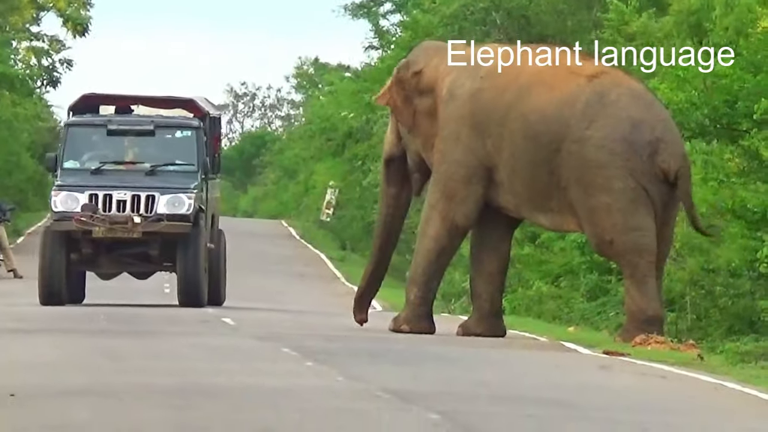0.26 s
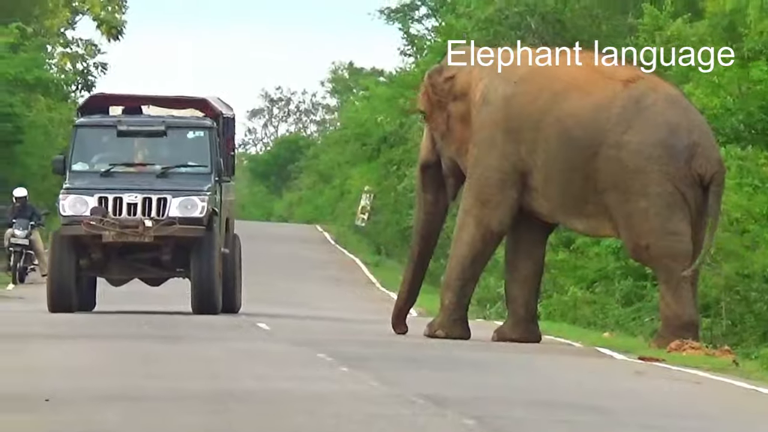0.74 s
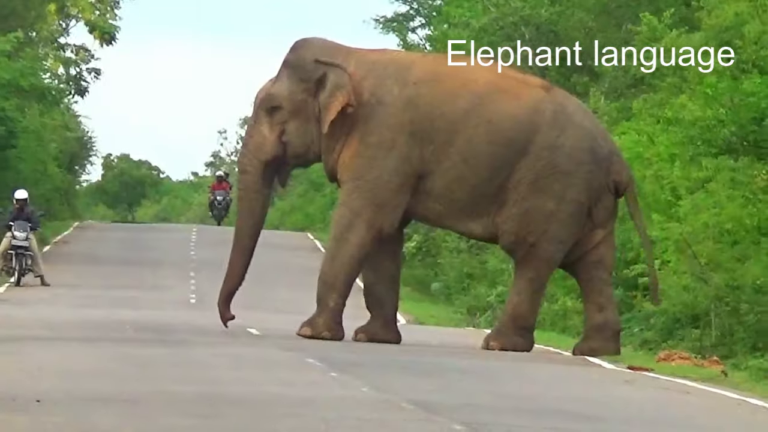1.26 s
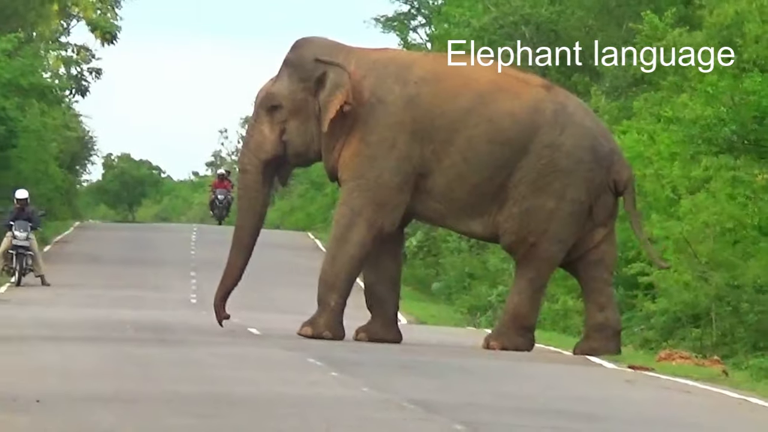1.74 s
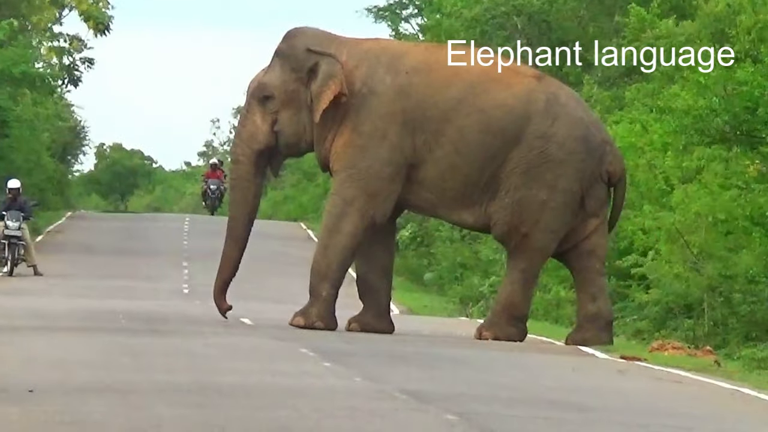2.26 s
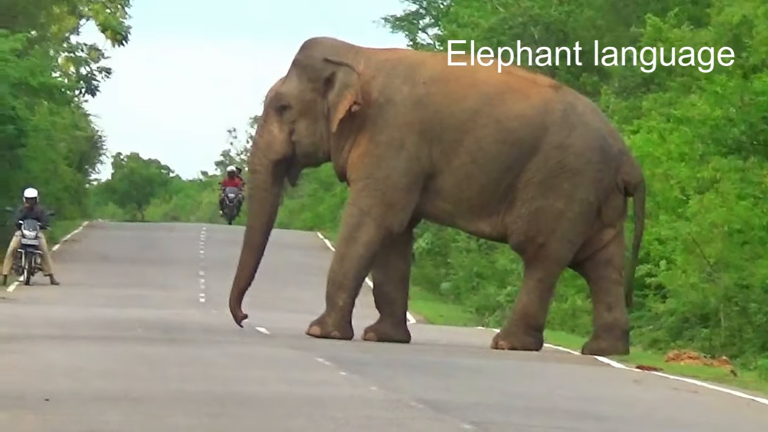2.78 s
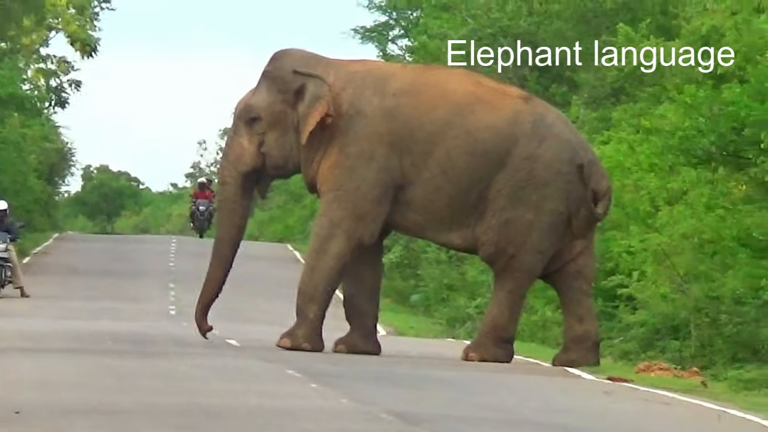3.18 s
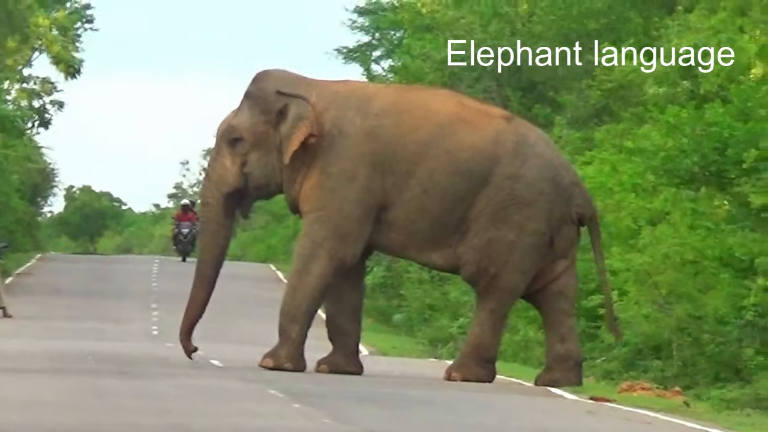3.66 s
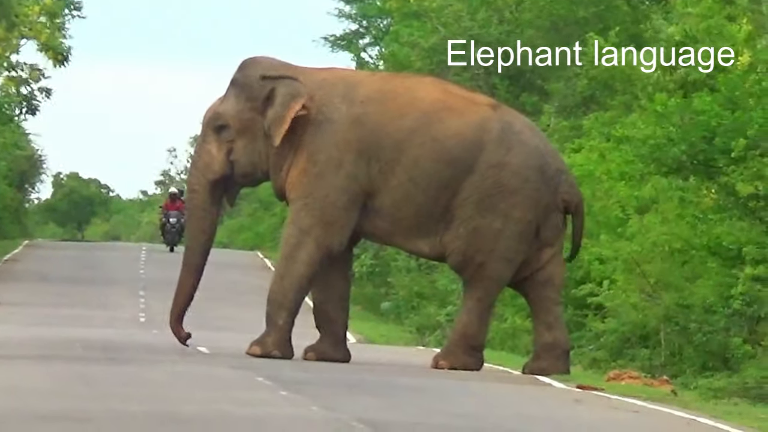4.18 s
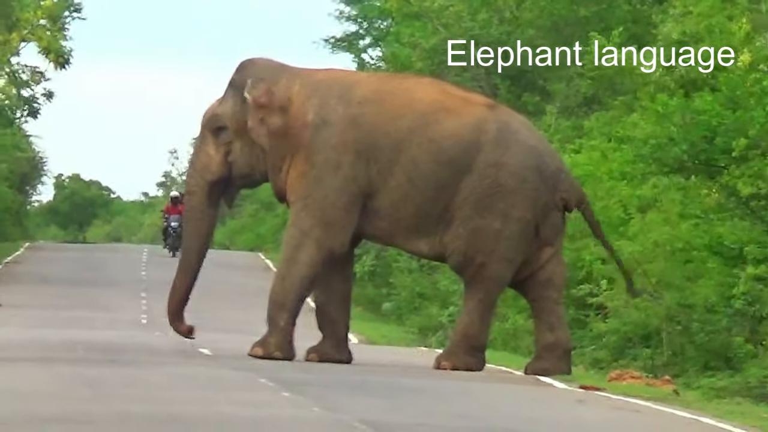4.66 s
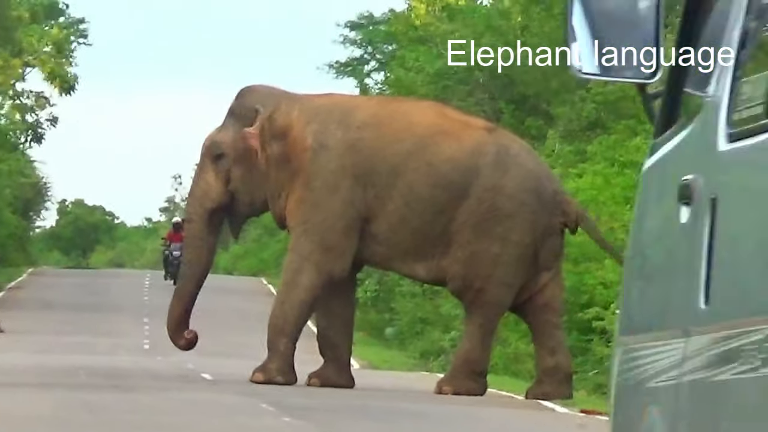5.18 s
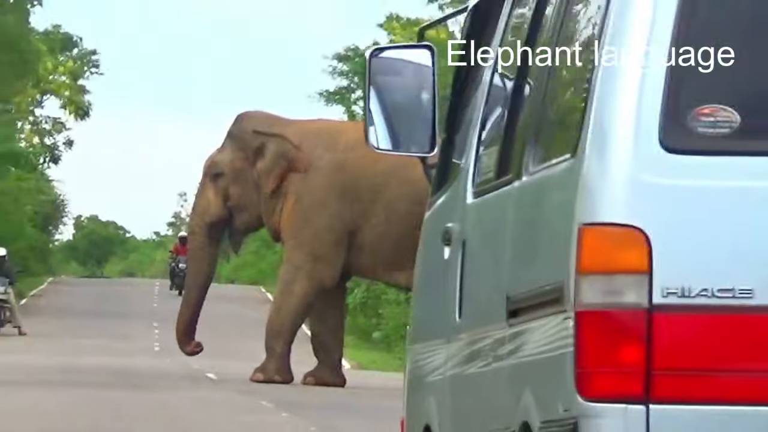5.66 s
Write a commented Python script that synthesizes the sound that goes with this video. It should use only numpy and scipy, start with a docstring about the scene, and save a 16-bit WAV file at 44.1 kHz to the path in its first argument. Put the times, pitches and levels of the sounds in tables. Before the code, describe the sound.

Quiet country road with a distant idling diesel and soft bumps, cut suddenly to a clattering van passing close and receding.

```python
"""A bird whistles over a country road's insects, a distant idling truck and a few soft low bumps.
The sound cuts abruptly to a diesel van that revs up, roars past and draws away, droning and squeaking.
Air, tyres and engine clatter are filtered stereo noise; the drone is a sum of engine orders.
One firing count times the van's chopped roar, ticks, drone and squeak; the bird is gliding sines with echo."""
import sys
import numpy as np
from scipy import signal
from scipy.fft import rfft, irfft
from scipy.io import wavfile
from scipy.ndimage import uniform_filter1d

SR = 44100
rng = np.random.default_rng(int(sys.argv[2]) if len(sys.argv) > 2 else 0)


def dump_mix(stems):
    """Bounce the given channels to the path in sys.argv[1] as a 16-bit WAV at rate SR."""
    frames = np.atleast_2d(stems).T  # one column per channel
    limited = np.clip(frames, -1, 1)  # hard clip at full scale
    pcm = np.round(limited * 32767).astype(np.int16)
    wavfile.write(sys.argv[1], SR, pcm)


N = 261513

T = np.arange(N) / SR
HZ = np.fft.rfftfreq(2048, 1 / SR)
FRAME_S = np.arange(N // 512 + 3) * 512 / SR
EDGE_HZ = 11150  # upper band edge
CUT_S = 1.135  # van heard from here on
ALONGSIDE_S = 3.19  # van beside the microphones

# left-right coherence of a point source [f/Hz, coherence 0-1]
POINT_COHERENCE = [(140, 1), (400, 0.99), (900, 0.87), (2000, 0.87), (4500, 0.92), (10500, 0.81)]
# left-right coherence of sound from all around [f/Hz, coherence 0-1]
AROUND_COHERENCE = [(140, 0.87), (400, 0.65), (800, 0.67), (2000, 0.54), (10500, 0.63)]
# stereo path of rumble, clatter and tyre roar, hiss
# [L-R ahead/dB, L-R behind/dB, added lean/dB, lean centre t/s, lean width/s]
CROSSING = [(0, -0.2, -6, 3.5, 0.66), (-2.5, 1.5, -2.5, 3.03, .42), (-1.9, 0.3, -1.7, 3.81, 0.74)]


def amp(db):
    """Decibels to gain."""
    return 10 ** (np.asarray(db) / 20)


def unit(x):
    """Scales to rms 1."""
    return x / np.sqrt(np.mean(x ** 2) + 1e-20)


def read(points, hz=HZ):
    """Interpolates a spectrum on a log-frequency axis."""
    f, value = np.transpose(points)
    return np.interp(np.log(hz + 1), np.log(f + 1), value)


def bells(modes):
    """Sum of Gaussian resonances and dips over frequency, in dB."""
    return sum(db * np.exp(-2 * ((HZ - hz) / width_hz) ** 2) for hz, width_hz, db in modes)


def colour(x, gain):
    """Zero-phase filter with a gain for each frequency."""
    return irfft(rfft(x) * np.interp(np.fft.rfftfreq(N, 1 / SR), HZ, gain), N)


def wander(rate_hz):
    """Smoothed random drift of rms 1, from knots at ten times the rate."""
    knots_s = np.arange(0, T[-1] + 1, 1 / (10 * rate_hz))
    draws = rng.standard_normal(len(knots_s))
    smooth = signal.fftconvolve(draws, signal.windows.hann(11), "same")
    return unit(np.interp(T, knots_s, smooth))


def place(db):
    """Left and right gains for a level difference."""
    return amp(np.array([db / 2, -db / 2]).reshape(2, -1))


def noise(gain, coherence):
    """Stereo noise of rms 1, shaped by gain and left-right coherence per frame and frequency."""
    a, b, c, d = rng.standard_normal((4, len(FRAME_S), len(HZ)))
    coherence = np.clip(coherence, 0, 1)
    left = a + 1j * b
    right = coherence * left + np.sqrt(1 - coherence ** 2) * (c + 1j * d)
    spectra = np.array([left, right]) * gain
    sound = signal.istft(spectra.transpose(0, 2, 1), nperseg=2048, noverlap=1536)[1]
    return unit(sound[:, :N])


def band(hz, width_hz, coherence):
    """Noise in one resonance, 6 dB down at the edges of its width."""
    return noise(1 / (1 + (2 * (HZ - hz) / width_hz) ** 4), read(coherence))


def strokes(turns, decay, uneven_db):
    """One quick rise and decay per turn, of random strength; decay is a share of a turn."""
    strength = amp(uneven_db * rng.standard_normal(1000))[turns.astype(int) % 1000]
    age = turns % 1 / decay
    return unit(strength * age * np.exp(-age))


def firing_rate():
    """Firings per second: idle, one smooth rise, then a slow creep in gear."""
    idle_hz, rev_hz, creep_hz_per_s = 30.19, 26.8, 1.364
    start_s, length_s = 1.581, 2.13
    revved = np.sin(np.pi / 2 * np.clip((T - start_s) / length_s, 0, 1)) ** 2
    return idle_hz + rev_hz * revved + creep_hz_per_s * np.maximum(T - start_s - length_s, 0)


def passing(closest_s, top_db, reach_s, ahead_db, behind_db):
    """Level in dB of a straight drive-by: a fixed drop per doubling of distance on each side."""
    doublings = np.log2(np.hypot(1, (T - closest_s) / reach_s))
    return top_db - np.where(T < closest_s, ahead_db, behind_db) * doublings


def crossing(ahead_db, behind_db, lean_db, lean_s, width_s, swing_s=.6):
    """Left and right gains that swing as the van goes by, with a temporary lean."""
    passed = (1 + np.tanh((T - ALONGSIDE_S) / swing_s)) / 2
    lean = lean_db * np.exp(-((T - lean_s) / width_s) ** 2)
    return place(ahead_db + (behind_db - ahead_db) * passed + lean)


def blend(times_s):
    """Shares of several states per frame, each state whole at its own time."""
    return np.transpose([np.interp(FRAME_S, times_s, row) for row in np.eye(len(times_s))])


def ports(turn_s=.3):
    """Microphone gains, left and right, by frame and frequency as the source goes from ahead to behind."""
    # microphone colour, source ahead and behind [f/Hz, L-R/dB]
    ports_ahead = [(200, -0.5), (450, -2), (850, .4), (1800, 1.3), (2700, -1.2), (4000, -1.5), (8000, 3.5),
                   (10000, 3.5)]
    ports_behind = [(400, -0.5), (850, 2.2), (1250, 0.7), (1800, -1.3), (2700, -1), (4000, .5), (6000, 0.5),
                    (10000, -0.8)]
    passed = (1 + np.tanh((FRAME_S[:, None] - ALONGSIDE_S) / turn_s)) / 2
    db = (1 - passed) * read(ports_ahead) + passed * read(ports_behind)
    return amp(np.array([db / 2, -db / 2]))


def air():
    """Distant traffic and insects: steady diffuse noise with a fixed spectrum."""
    # relative spectral density [f/Hz, level/dB per Hz]
    air_spectrum = [(25, -32), (70, -12.5), (170, 0.5), (330, -4), (450, -8.5), (650, -2), (900, -14),
                    (2800, -17.5), (4000, -24), (6000, -25), (7500, -11), (8800, -25), (9600, -24),
                    (11000, -35)]
    gain = amp(read(air_spectrum)) * (HZ < EDGE_HZ)
    return amp(-52.64) * noise(gain, read(AROUND_COHERENCE))


def truck():
    """Far diesel idle at about 25 firings/s: each firing gives a tick and a dull, uneven knock."""
    turns = np.cumsum(25 + .15 * wander(3.7)) / SR
    ticks = strokes(turns, decay=.07, uneven_db=1.2) * band(2600, 1600, AROUND_COHERENCE)
    knocks = strokes(turns, decay=0.29, uneven_db=2) * band(350, 530, AROUND_COHERENCE)
    return amp(-68.5) * ticks + amp(-62.0) * knocks


def bumps(rise_s=0.0065):
    """Soft bumps: low noise under short rise-and-decay envelopes."""
    # [t/s, relative peak/dB]
    bump_times = [(0.196, -47), (0.259, -37), (0.289, -37), (0.314, -43), (0.398, -38), (0.621, -42),
                  (0.675, -37), (0.735, -37), (0.774, -37), (0.829, -34.5)]
    envelope = 0
    for start_s, db in bump_times:
        age = np.maximum(T - start_s, 0) / rise_s
        envelope = envelope + amp(db) * age * np.exp(1 - age)
    return amp(-9.5) * envelope * band(240, 240, AROUND_COHERENCE)


def bird(late=1.45):
    """Nearly pure notes swell and slide onto and off a held pitch, with a decaying echo from the trees."""
    # notes [start t/s, length/s, held f/Hz, start offset/Hz, end offset/Hz, level/dB]
    whistle = [(-.035, 0.15, 2940, -300, 0, -58), (.13, .085, 2945, 0, 0, -67),
               (0.187, .285, 2425, 320, -400, -53.5)]
    slide_in, slide_out = 0.5, .28  # shares of a note
    call = 0
    for start_s, length_s, held_hz, in_hz, out_hz, db in whistle:
        u = np.clip((T - start_s) / length_s, 0, 1)
        onto_hz = in_hz * np.maximum(1 - u / slide_in, 0) ** 2
        off_hz = out_hz * np.maximum(1 - (1 - u) / slide_out, 0) ** 1.4
        hz = (held_hz + onto_hz + off_hz) * (1 + 0.0052 * wander(115))
        tone = np.sqrt(2) * np.sin(2 * np.pi * np.cumsum(hz) / SR)
        swell = np.sin(np.pi * u ** late)  # late > 1 delays the peak
        call = call + amp(db) * swell * tone
    trees = rng.standard_normal((2, SR // 2)) * amp(-60 * T[:SR // 2] / .5)  # 60 dB decay in 0.5 s
    echo = signal.fftconvolve(call[None], trees / np.linalg.norm(trees[0]), axes=1)[:, :N]
    return call * place(.6) + amp(-10) * echo


def squeak(turns):
    """Narrow-band ring, rubbed once per engine cycle of four firings, in bouts."""
    # bouts [start t/s, length/s, level/dB]
    bout_times = [(2.8, 0.39, -46), (3.098, .45, -39.5), (3.82, 0.17, -37), (4.05, 0.48, -46.5),
                  (4.516, 0.55, -40), (5.047, 0.51, -55), (5.456, 0.27, -45), (5.7, .25, -53)]
    ring_hz, width_hz, fade_s = 4717, 220, 0.043
    rub = unit(.4 + strokes(turns / 4 + .64, decay=.18, uneven_db=.5))
    ring = band(ring_hz, width_hz, POINT_COHERENCE)
    # friction holds the ring's strength fairly even
    steady = unit(ring / np.sqrt(abs(signal.hilbert(ring)) + 0.43))
    bouts = 0
    for start_s, length_s, db in bout_times:
        edge_s = np.minimum(T - start_s, start_s + length_s - T)
        bouts = bouts + amp(db) * np.clip(edge_s / fade_s, 0, 1)
    return bouts * rub * steady


def tick(turns):
    """Each injection rings two engine modes; the higher one grows as the van nears."""
    peak_s, peak_db, rise_db_per_s, fall_db_per_s = 1.6, -43.5, 16, 20
    blows = strokes(turns + .3, decay=.12, uneven_db=1.5)
    bright_db = np.interp(T, [1.2, 2.4], [-23, -2])
    low_mode = band(2524, 237, POINT_COHERENCE)
    high_mode = band(5430, 300, POINT_COHERENCE)
    ring = low_mode + amp(bright_db) * high_mode
    # falls as the van's front turns away
    level_db = peak_db - np.where(T < peak_s, rise_db_per_s, fall_db_per_s) * abs(T - peak_s)
    return amp(level_db) * blows * ring * crossing(*CROSSING[1])


def drone(turns, rough=0.19, radiate_hz=65):
    """Fluttering engine orders of exhaust, pipe, fan and intake; the deepest radiate poorly."""
    # pass-by of exhaust, pipe boom, fan, intake
    # [closest t/s, reference level/dB, time to drive closest distance/s, ahead and behind loss/dB per doubling]
    tone_paths = [(3.72, -39, 0.37, 13.3, 4.84), (3.62, -35, 0.61, 19, 23), (3.17, -30.5, 0.26, 13.5, 6.2),
                  (3.02, -44.5, .3, 17, 26)]
    # orders [multiple of firing rate, level re path/dB]
    exhaust = [(1, -8), (2, -0.5), (3, -8), (4, 0.5), (6, -5.5), (9, -6), (12, -5), (13, -7.5)]
    boom = [(5, 5.5), (10.2, -7), (10.95, 5), (17, -34.5)]
    fan = [(3.77, 0.5), (7.54, -22), (11.31, -8)]
    intake = [(2, -1)]
    firing_hz, out = firing_rate(), 0
    for orders, path in zip((exhaust, boom, fan, intake), tone_paths):
        level_db = passing(*path)
        for order, db in orders:
            flutter = 1 + rough * np.sqrt(order / 4) * (wander(5) + 1j * wander(17))
            radiated = 1 / np.sqrt(1 + (radiate_hz / (order * firing_hz)) ** 8)
            tone = (flutter * np.exp(2j * np.pi * (order * turns + rng.random()))).real
            out = out + amp(level_db + db) * radiated * tone
    return np.sqrt(2) * out * crossing(*CROSSING[0])


def roar(turns):
    """Engine and tyre noise: colour turns with the van, and firings chop its level."""
    # pass-by of rumble, clatter and tyre roar, hiss
    # [closest t/s, level/dB, time to drive closest distance/s, ahead and behind loss/dB per doubling]
    noise_paths = [(3.07, -24.5, 0.27, 9, 5.72), (3.29, -19, .66, 10.5, 8.65),
                   (3.34, -26, 0.41, 11.5, 6.23)]
    # relative spectral density from each side [f/Hz, level/dB per Hz]
    ahead = [(40, -49), (90, -19), (150, -28), (235, 3), (370, -11), (480, -5), (820, 1), (1250, -0.5),
             (1650, -4), (2650, -7.5), (2900, -14.5), (4900, -22.5), (7500, -23), (11000, -32.5)]
    nearing = [(40, -50), (85, -29), (130, -12), (240, -3.5), (460, 0.5), (570, -7), (890, 1),
               (1300, -13.5), (1640, -8.5), (2900, -18), (3800, -17), (5200, -23), (8800, -31.5),
               (11000, -30)]
    beside = [(40, -42), (130, -19), (200, -1.5), (325, 0.5), (440, -9.5), (655, -0.5), (760, -2.5),
              (1000, -3), (1400, -8.5), (1900, -5.5), (4300, -19), (5600, -22.5), (7300, -20),
              (8700, -25.5), (11000, -18)]
    leaving = [(40, -32), (90, -16), (160, -9), (260, -3.5), (400, -4.5), (610, 3.5), (880, -7), (1800, -7),
               (3000, -10.5), (4800, -17), (5500, -21.5), (7500, -19), (8800, -27.5), (11000, -29)]
    behind = [(40, -37), (90, -25), (140, -16), (240, -2), (320, -8.5), (400, -25), (530, 2), (720, 1.5),
              (1250, -1), (2500, -6.5), (4300, -13), (5500, -19), (7600, -19), (8800, -22), (11000, -21.5)]
    # when each side faces the microphones [t/s]
    facing_s = [1.95, 2.65, 3.15, 3.7, 4.55]
    # body resonances and road-echo dips [f/Hz, width/Hz, level/dB]
    front_modes = [(1383, 49, -23), (1590, 107, 7.5), (2190, 110, -8), (2480, 160, 0), (2770, 160, -13),
                   (3205, 130, 9.5), (3800, 150, 5), (4500, 190, 6), (5360, 160, 2)]
    rear_modes = [(922, 112, -14), (1430, 70, -3.5), (1626, 84, 4), (2820, 41, -11)]
    # left-right coherence [f/Hz, coherence 0-1]
    coherence_ahead = [(140, .99), (400, 0.98), (800, 0.94), (1200, 0.8), (1800, 0.84), (2700, 0.9),
                       (3800, 0.4), (8000, .5), (10000, 0.9)]
    coherence_beside = [(70, 0.68), (200, .97), (600, 0.72), (850, .32), (1250, 0.36), (2200, 0.54),
                        (4000, 0.5), (8000, .42), (10000, 0.85)]
    coherence_behind = [(70, 0.35), (130, 1), (380, 0.92), (550, 0.99), (850, 0.85), (1250, 0.87),
                        (4000, .92), (8000, .76), (10000, .86)]
    # when each coherence holds [t/s]
    coherence_s = [2.03, 2.87, 4.2]
    # chopping by each firing [f/Hz, depth 0-1]
    knock_ahead = [(200, 0), (900, 0.05), (2500, 0.31), (5400, 0), (7000, 0.18)]
    knock_behind = [(200, 0.39), (1500, 0.058), (4500, 0.15), (7300, 0.17), (10500, 0.33)]
    close_s = 0.8

    sides_db = np.array([read(ahead) + bells(front_modes), read(nearing), read(beside),
                         read(leaving), read(behind) + bells(rear_modes)])
    coherences = np.array([read(coherence_ahead), read(coherence_beside), read(coherence_behind)])
    coherence = blend(coherence_s) @ coherences
    near = np.exp(-((FRAME_S[:, None] - ALONGSIDE_S) / close_s) ** 2)
    # narrow patches of colour come and go as the paths round the body change
    patches = rng.standard_normal((len(FRAME_S), len(HZ)))
    patches = uniform_filter1d(patches, size=14, axis=0)
    patches = unit(uniform_filter1d(patches, size=5, axis=1))
    field = amp(blend(facing_s) @ sides_db + (1.66 + 0.83 * near) * patches)

    zone = np.digitize(HZ, [450, 3000])  # rumble, clatter and tyre roar, hiss
    sound, microphones = 0, ports()
    for k, (path, swing) in enumerate(zip(noise_paths, CROSSING)):
        part = field * (zone == k) * (HZ < EDGE_HZ)
        even = part / np.linalg.norm(part, axis=1, keepdims=True)  # equal power per frame
        layer = noise(microphones * even, coherence)
        sound = sound + amp(passing(*path)) * crossing(*swing) * layer

    knock = strokes(turns, decay=.16, uneven_db=2)
    passed = np.interp(T, [2.3, 3.2], [0, 1])
    out = 0
    for depths, weight in (knock_ahead, 1 - passed), (knock_behind, passed):
        depth = np.clip(read(depths), 0, 1)
        rms = np.sqrt(1 - 2 * depth * (1 - depth) * (1 - knock.mean()))  # chopping keeps the power
        smooth = colour(sound, (1 - depth) / rms)
        chopped = knock * colour(sound, depth / rms)
        out = out + weight * (smooth + chopped)
    return out


def scene():
    """The quiet road, then the van, over continuous air."""
    turns = np.cumsum(firing_rate() * (1 + 0.0023 * wander(5.1))) / SR  # firings so far
    cut = np.clip((T - CUT_S) / .004, 0, 1)
    quiet_road = truck() + bumps() + bird()
    van = squeak(turns) + tick(turns) + drone(turns) + roar(turns)
    return air() + (1 - cut) * quiet_road + cut * van


def record(dry):
    """Linear-phase low-pass at the upper band edge."""
    lowpass = signal.firwin(1023, EDGE_HZ, window=("kaiser", 9), fs=SR)
    return signal.oaconvolve(dry, lowpass[None], "same")


dry = scene()
out = record(dry)
dump_mix(out)
```